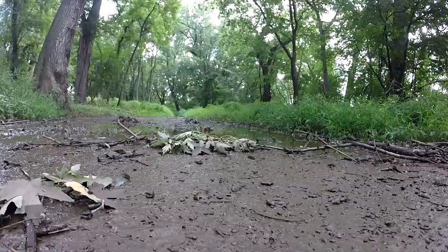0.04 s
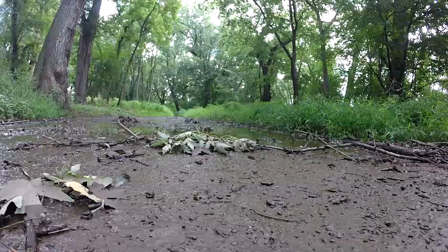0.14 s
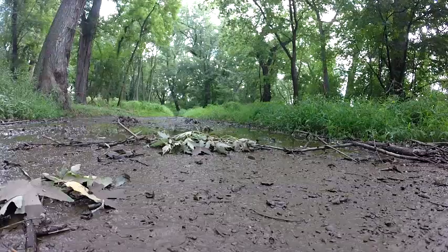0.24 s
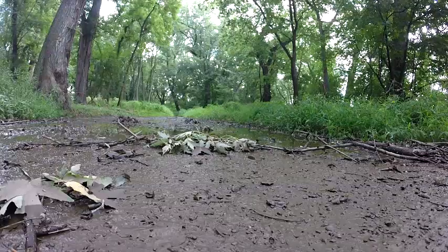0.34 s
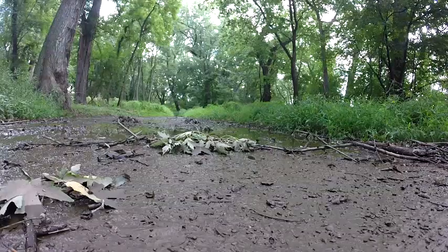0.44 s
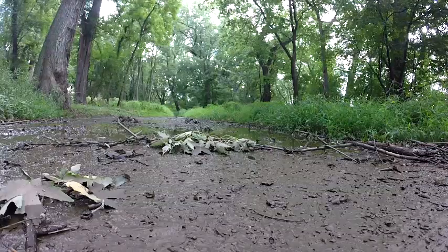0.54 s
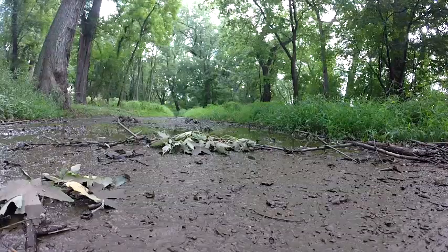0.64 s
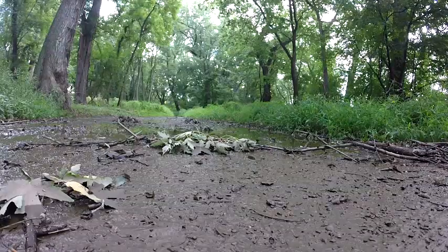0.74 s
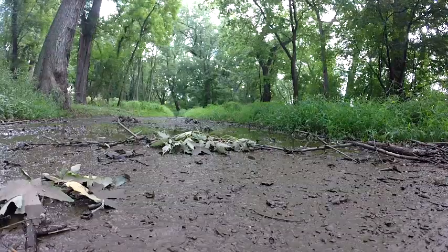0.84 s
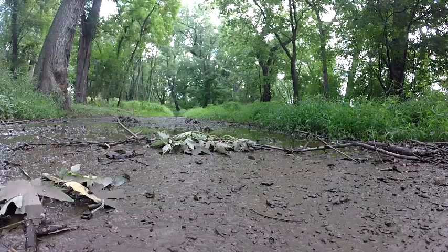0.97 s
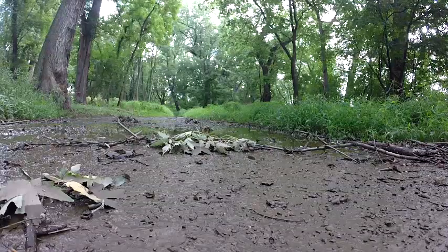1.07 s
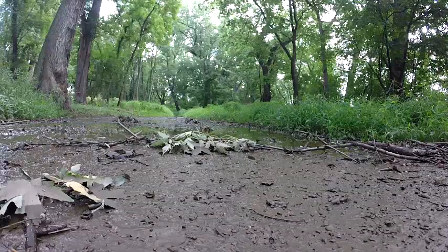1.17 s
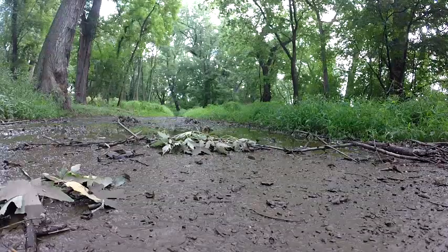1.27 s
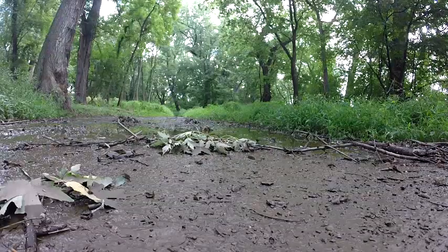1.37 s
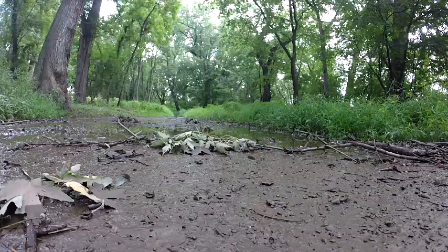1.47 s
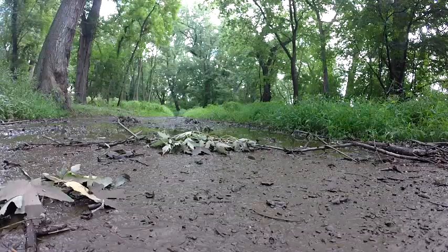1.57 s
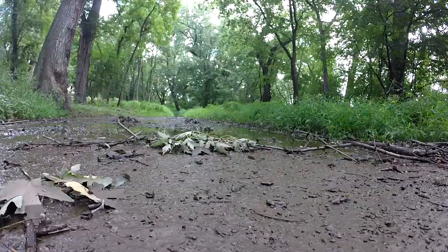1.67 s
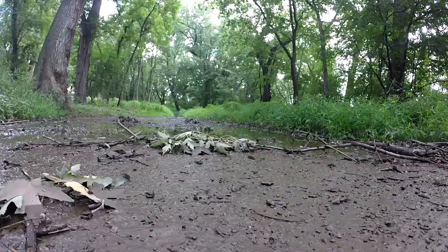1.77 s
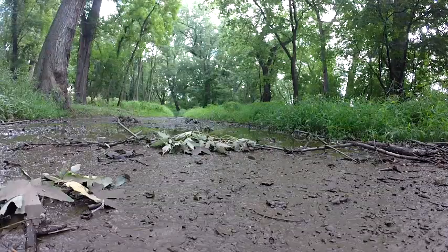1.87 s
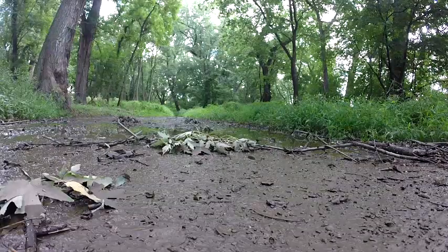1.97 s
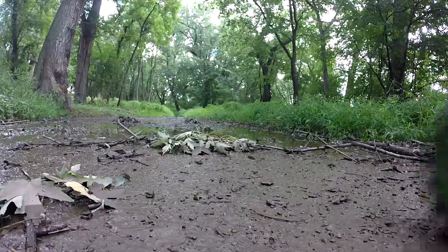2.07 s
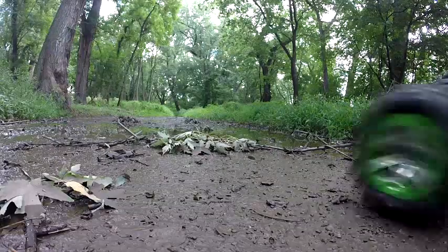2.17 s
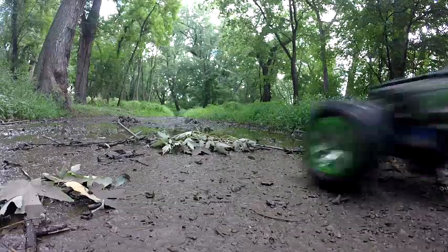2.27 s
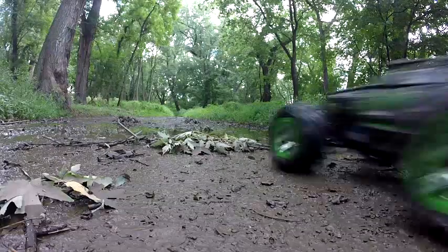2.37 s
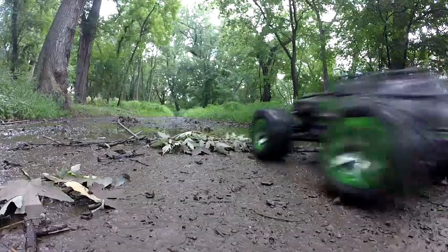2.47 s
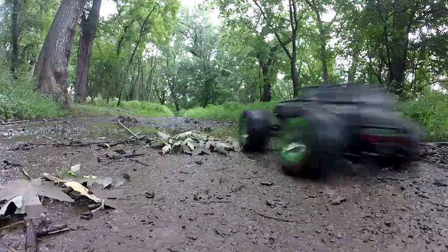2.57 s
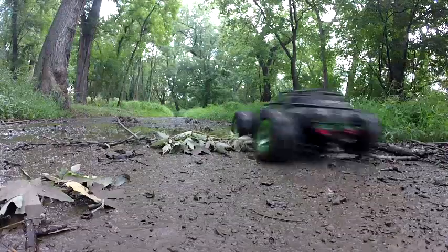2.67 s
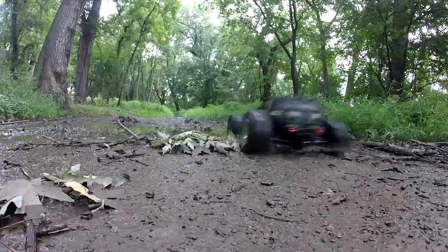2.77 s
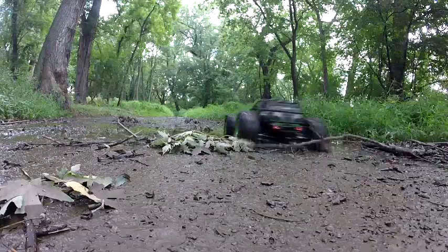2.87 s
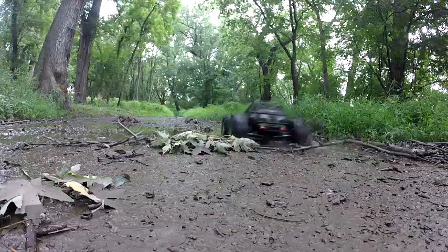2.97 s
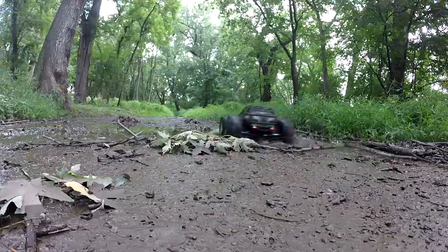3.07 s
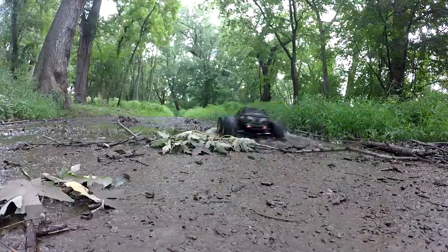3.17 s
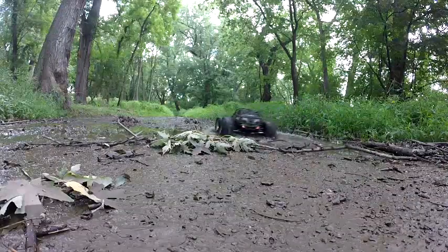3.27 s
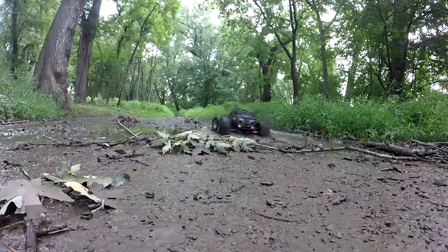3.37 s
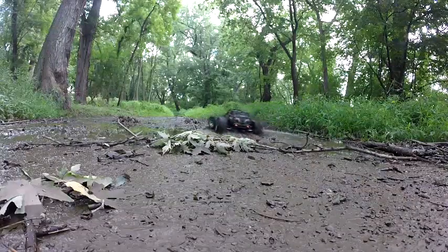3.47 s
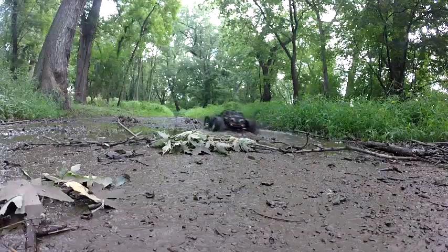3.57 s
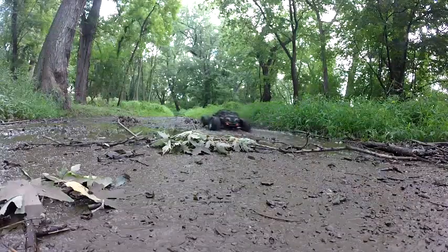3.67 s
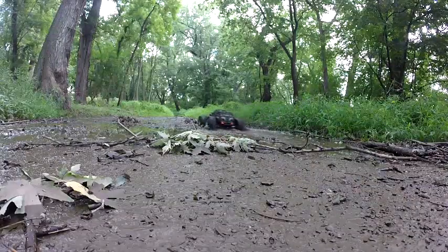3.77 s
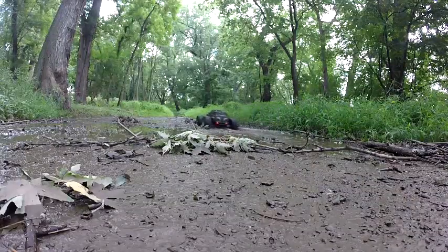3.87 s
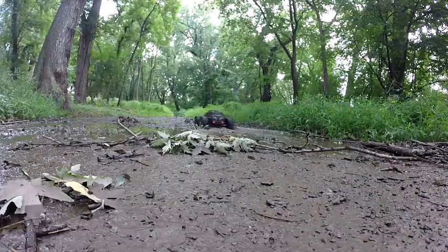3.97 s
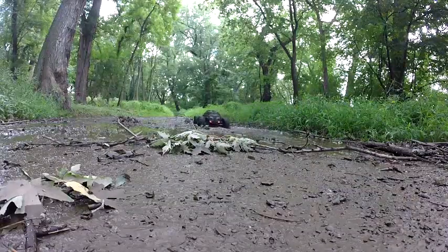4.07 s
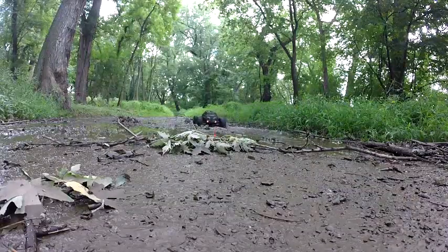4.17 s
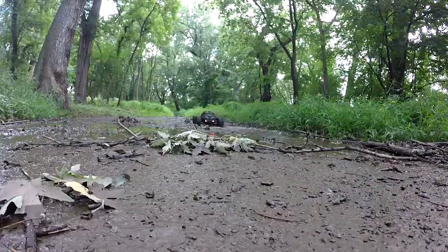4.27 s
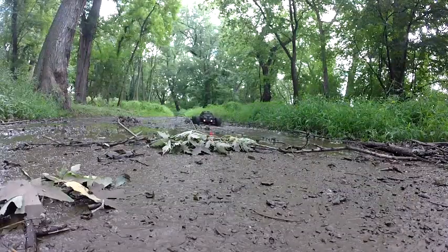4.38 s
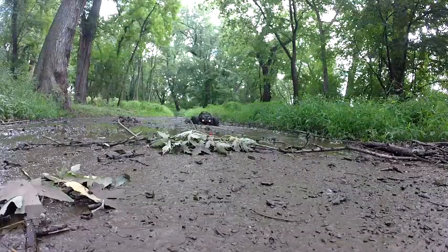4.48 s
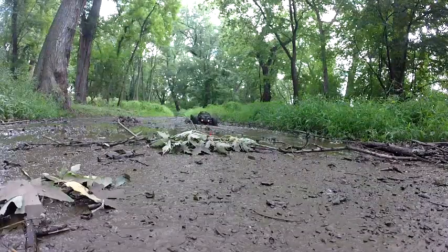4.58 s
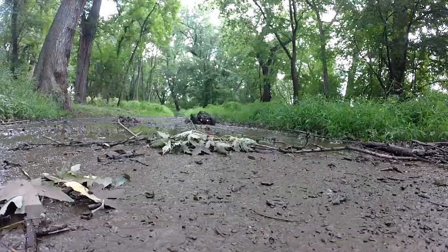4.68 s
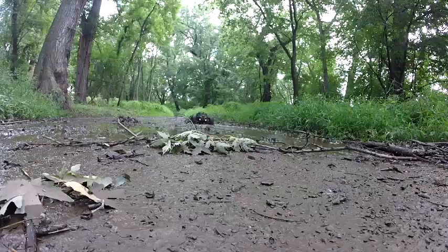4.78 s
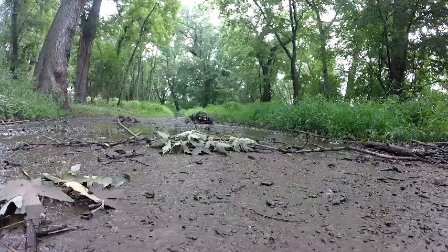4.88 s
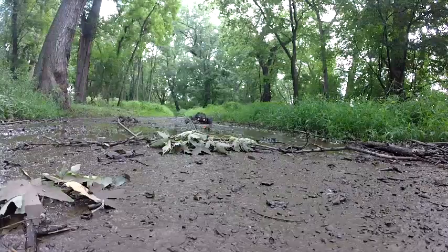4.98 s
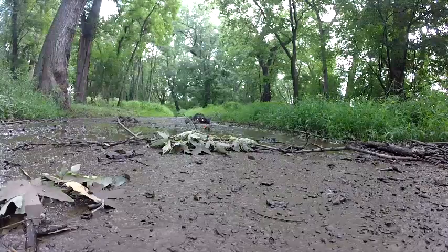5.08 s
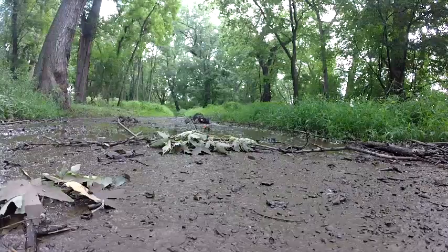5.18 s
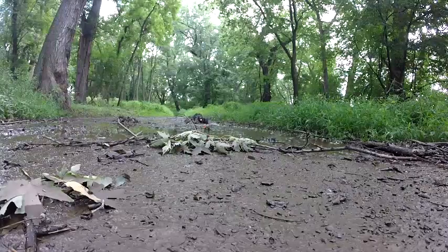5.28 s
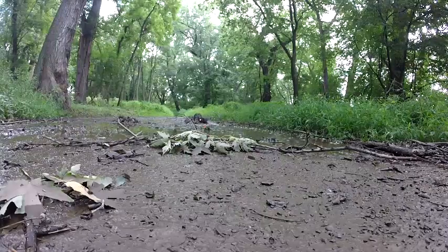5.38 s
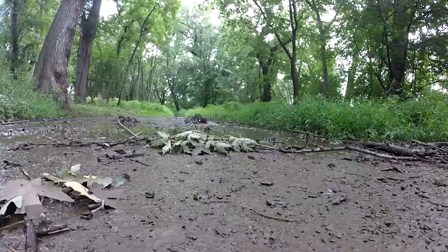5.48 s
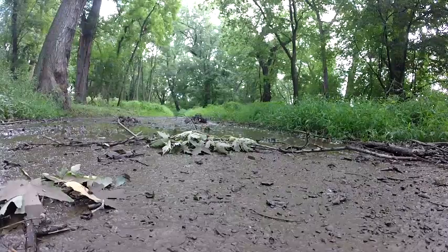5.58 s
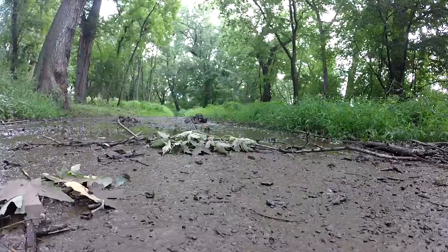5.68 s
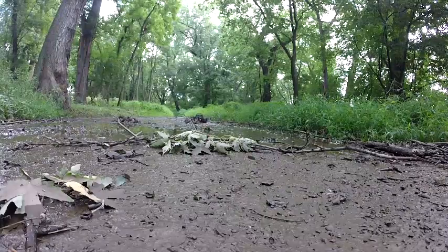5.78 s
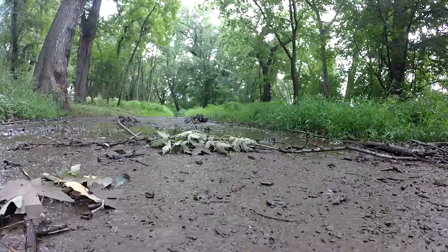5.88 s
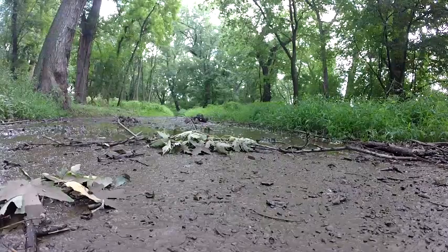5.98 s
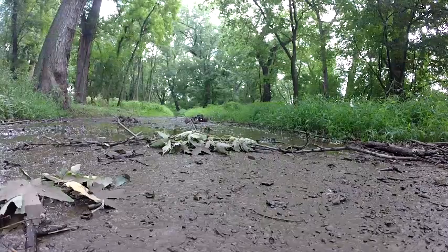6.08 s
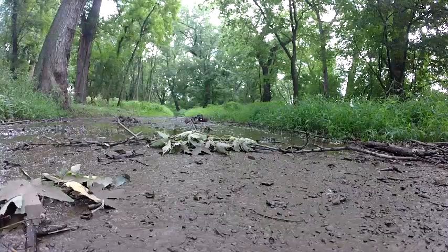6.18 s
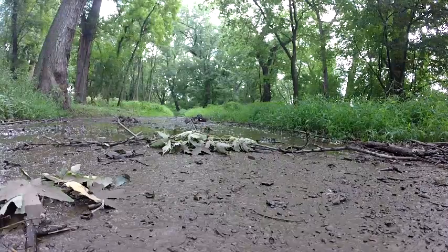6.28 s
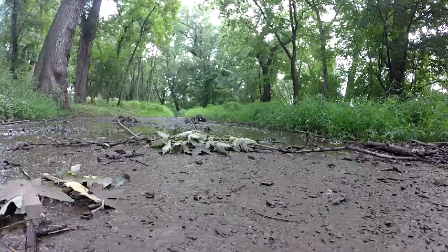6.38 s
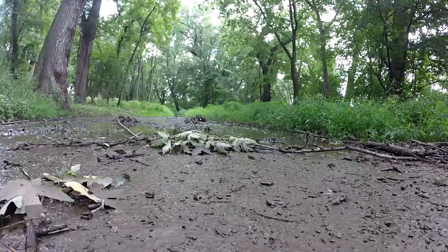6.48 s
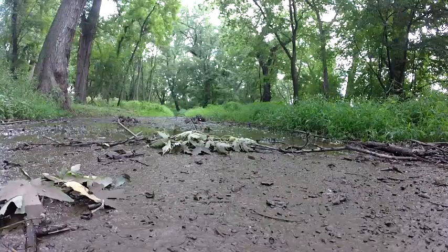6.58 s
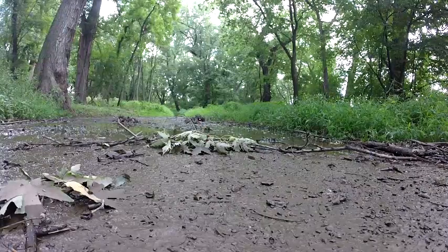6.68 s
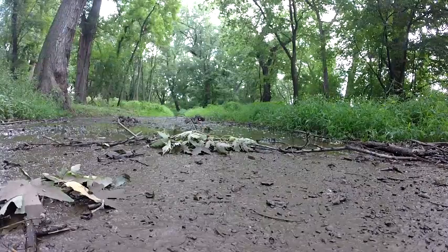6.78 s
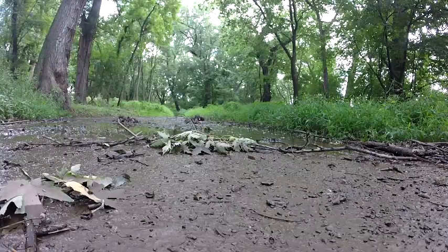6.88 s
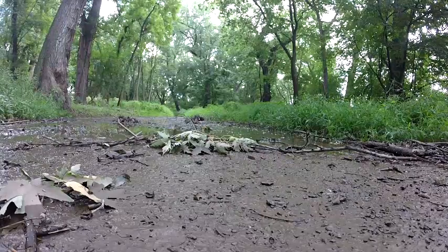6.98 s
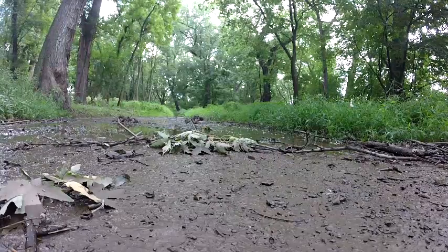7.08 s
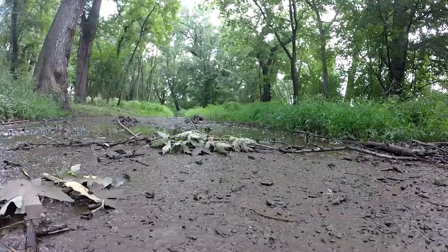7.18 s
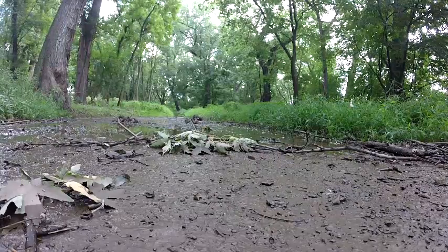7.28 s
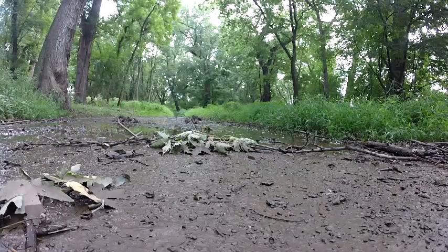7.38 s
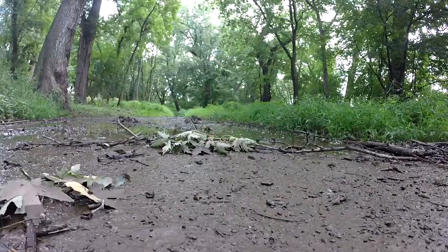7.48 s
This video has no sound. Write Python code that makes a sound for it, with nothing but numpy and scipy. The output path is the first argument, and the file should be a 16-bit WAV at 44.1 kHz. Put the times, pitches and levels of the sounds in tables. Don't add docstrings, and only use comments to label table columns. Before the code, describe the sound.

Faint gear whine from a remote-controlled truck rises over soft woodland air, pulsing as its wheels slip and grip. Plastic rattle thickens into a brief harsh pass right beside the microphone. The truck then shrinks into the distance, still singing high and unsteady, with scattered twig ticks and knocks. Sound is mono, muffled and ringing through a sealed camera case, with faint echoes from trees.

```python
import sys
import numpy as np
from scipy import signal
from scipy.fft import rfft, irfft
from scipy.io import wavfile
from scipy.ndimage import uniform_filter1d

SR = 44100
rng = np.random.default_rng(int(sys.argv[2]) if len(sys.argv) > 2 else 0)


def unload_wav(signal):
    wavfile.write(
        sys.argv[1],
        SR,
        np.round(np.clip(np.atleast_2d(signal).T, -1, 1) * 32767).astype(np.int16),
    )


def convert_level_to_amplitude(level_db):
    exponent = np.asarray(level_db, float) / 20
    return 10 ** exponent


N = 332514
TIME = np.arange(N) / SR
PASSING = (2.15, 2.98)
SPUR_TEETH = 68
WHINE_ORDER, PINION_ORDER = .856, .382


def evened(x):
    return x / np.sqrt(np.mean(x ** 2) + 1e-20)


def curves(rows):
    s, *columns = np.transpose(rows)
    return [np.interp(TIME, s, column) for column in columns]


def wander(hz):
    return evened(signal.lfilter(*signal.butter(2, hz, fs=SR), rng.standard_normal(N)))


def tone(turns, db):
    return np.sqrt(2) * convert_level_to_amplitude(db) * np.cos(2 * np.pi * turns)


def resonate(x, hz, width):
    pole = np.exp((2j * np.pi * hz - np.pi * width) / SR)
    ring = signal.lfilter([(1 - abs(pole)) ** 2], [1, -2 * pole, pole ** 2], x + 0j)
    return 2 * ring.real


def gears(teeth):
    runout = [(1, .26, 0), (2, .45, 1.9), (3, .2, 2.5), (4, .22, 3.2)]
    # time [s], share [0-1].
    load = [(0, 1), (1.25, 1), (1.32, .35), (2.1, .5), (2.2, .5), (2.5, .5), (5.8, .5), (5.95, .9),
            (7.54, .9)]
    # time [s], level [dB].
    current = [(.95, 1), (1.05, 4.5), (1.2, -8), (1.35, 4), (1.8, -1), (2.03, -8), (2.2, -8), (2.55, -8),
               (2.73, -1.5), (3.31, 3), (3.39, 0), (4.03, -18), (4.15, 4), (4.85, 3), (5.5, 3.7),
               (5.62, -7.5), (6.25, -6), (7.54, 0.5)]
    # level when close [dB], share of the distance loss, change once turned away [dB].
    overtone_levels = [
        (-32.5, 1.07, -8),
        (-43.5, 0.96, -10),
    ]
    # level when close [dB], share of the distance loss, change once turned away [dB],
    # share of the motor current.
    low_levels = [
        (-48.5, 0.648, -3, 0.655),
        (-41.5, 0.88, -11, .1),
        (-55.5, 0.66, 3, 0.13),
    ]
    hz = mesh_hz()
    bite_db = slips()[1]
    current_db = curves(current)[0]

    uneven = sum(depth * np.cos(2 * np.pi * k * teeth / SPUR_TEETH + phase) for k, depth, phase in runout)
    throb = 1 + curves(load)[0] * uneven + .2 * wander(120)
    slap = teeth + np.interp(TIME, (2.2, 2.34), (.036, .085)) * wander(200)

    mesh_db = heard(close_db=-31, share=.4, away_db=-10) + ringing(hz) + bite_db
    mesh = tone(slap, mesh_db - 1)
    ring_shares = (0.75, 0.41)
    for k, part, ring in zip((2, 3), overtone_levels, ring_shares):
        overtone_db = heard(*part) + ring * ringing(k * hz) + 0.49 * bite_db
        mesh += tone(k * slap, overtone_db - 2 + 4 * wander(22))
    fourth_db = overtone_db + np.interp(TIME, PASSING, (-9, -15))
    mesh += tone(4 * slap, fourth_db - 2 + 4 * wander(22))

    whine_db = heard(close_db=-37.5, share=0.58, away_db=.3) + current_db + ringing(WHINE_ORDER * hz)
    clean = tone(WHINE_ORDER * teeth, whine_db + 1.5 * wander(9.3))
    for k, (*part, pull) in zip((PINION_ORDER, WHINE_ORDER / 2, 1 / 2), low_levels):
        low_db = heard(*part) + pull * current_db + ringing(k * hz)
        clean += tone(k * teeth, low_db + 2.67 * wander(23))
    return throb * mesh + clean


def mesh_turns():
    return np.cumsum(mesh_hz() * (1 + .0025 * wander(40))) / SR


def mesh_hz():
    # time [s], gear mesh [Hz].
    throttle = [(0, 1871), (.3, 1775), (.43, 1821), (.9, 2032), (1.41, 2163), (1.81, 2225), (2.11, 2299),
                (2.165, 2680), (2.26, 2707), (2.3, 2920), (2.39, 3147), (2.56, 3276), (2.7, 3425),
                (3.25, 3418), (3.5, 3150), (4.4, 3364), (5.7, 3205), (7.54, 3135)]
    return curves(throttle)[0] * (1 + slips()[0] / 100)


def slips():
    # time of top speed [s], lift [%], sag [%], length of the fall [s], bite of the teeth [dB].
    grips = [(0.0, 4, 6.8, 0.16, 4), (.565, 7.5, 4.9, 0.13, 4), (1.074, 6.5, 6.08, 0.13, 4.5),
             (1.529, 4.5, 5, 0.1217, 6), (1.969, 5, 4.56, .115, 14.5), (2.144, 0.2458, 0.404, 0.0788, 1.5),
             (2.67, 3.5, 2.07, 0.0642, 7), (2.809, 1.5, 2.47, 0.075, 13), (2.967, 3, 2.4, 0.158, 5.5),
             (3.26, 0.95, 3.76, .12, 5), (3.571, -0.27, 5.2, 0.1256, 3), (4.19, 2, 3.8, 0.12, 7),
             (4.471, 4.5, 1, 0.1045, 7), (4.76, 3.5, 6.5, 0.11, 11), (5.05, 8, 2.33, 0.096, 12.5),
             (5.21, 1.47, 0.21, .07, 8.5), (5.352, 3.5, 0.28, 0.074, 13.5), (5.5, 3.5, 3.3, 0.0689, 16),
             (5.892, 0.2, 8.4, 0.078, 8), (6.051, -1.5, 8.8, 0.098, 7.5), (6.34, -2, 6.1, 0.083, 9.5),
             (6.575, 0.96, 2.6, 0.11, 8.5), (7.229, 3.5, .1, 0.076, 3), (7.373, 0.8, 6, 0.071, 7.5)]
    spin_up, recover, bite_at = .85, 1.01, .25
    ease = 0.786
    slack_db = -0.14
    inertia_s = 0.023
    speed, bite_db = np.zeros((2, N))
    for s, lift, sag, fall, db in grips:
        knots = s + fall * np.array([-spin_up, 0, 1, 1 + recover])
        stage = np.interp(TIME, knots, range(4))
        stage -= ease * np.sin(2 * np.pi * stage) / (2 * np.pi)
        speed += np.interp(stage, range(4), [0, lift, -sag, 0])
        bite_times = [*knots[:2], s + bite_at * fall, *knots[2:]]
        bite_db += np.interp(TIME, bite_times, [0, slack_db * lift, db, db, 0])
    return uniform_filter1d(speed, int(inertia_s * SR), mode="nearest"), bite_db


def heard(close_db, share, away_db):
    # time [s], level [dB].
    near_levels = [(0, -59.5), (.09, -56), (.5, -56.5), (1.0, -54), (1.5, -49.5), (1.95, -43), (2.12, -42),
                   (2.14, -33), (2.24, -26), (2.3, -35), (2.48, -35), (2.68, -40.5), (3.2, -44.5),
                   (4.1, -53), (5.1, -59), (5.7, -58.5), (7.4, -62.5), (7.54, -65.5)]
    full_close_db = -30
    distance_db = curves(near_levels)[0] - full_close_db
    return close_db + share * distance_db + np.interp(TIME, PASSING, (0, away_db))


def ringing(hz):
    # resonance [Hz], width [Hz], gain [dB].
    ring_modes = [(1033, 234, -1), (1300, 133, -2.5), (1372.5, 70, -1), (1838.4, 204, -5.7),
                  (1998, 192, -4.3), (2120, 90, -10), (2680, 270, -5), (2920, 170, 0.2), (3412, 238, -17),
                  (3780, 600, -6.5), (5350, 160, 4), (6028, 847, -4), (6990, 488, -6), (8370, 3850, -8.5)]
    return 20 * np.log10(sum(convert_level_to_amplitude(db) / (1 + (2 * (hz - f) / width) ** 2) ** 1.51 for f, width, db in ring_modes))


def chatter(teeth):
    # centre [Hz], width [Hz], level from the front [dB],
    # level from behind [dB].
    shell = [(656, 350, -25, -4.5), (985.4, 147, -4, -25.5), (1097, 33.2, -3.5, -1), (1300, 101.7, 1, 0.5),
             (1572, 98, 3.5, 10.5), (1760, 176, 7.5, 3), (2260, 480, -35, -67)]
    case = [(2117, 54, 7.5, -16), (2188, 241, -13, -8), (2580, 383, -4.5, -14.5), (2667, 103, 2.5, 0),
            (2911, 70, 0, 0.5), (3314, 260, -39.5, -9), (3320, 195, -1.5, -3.5)]
    fizz = [(4326, 380, -9, -0.5), (4800, 92, -1, 1), (5660, 575, -4.5, -0.5), (6864, 620, 0.5, -1.5),
            (7040, 822, -1, -4.5), (9140, 1830, -19.5, -18), (11820, 3100, -24, -28.5)]
    # level when close [dB], share of the distance loss, change once turned away [dB],
    # share of a jolt.
    rattle_levels = [
        (-24, 0.988, -9.5, 0.587),
        (-33, 0.571, 0.85, 0.97),
        (-30, 1.005, -0.04, 0.86),
    ]
    # time [s], extra level [dB], length [s].
    jolts = [(0.247, -1, .15), (1.154, 3, .2), (1.56, 1.5, 0.12), (1.993, 6, 0.061), (2.43, 0, .06),
             (3.09, 2, 0.076), (3.233, 0.5, .15), (3.686, 1.5, .5), (4.161, -0.5, 0.13), (4.741, -0.5, .1),
             (5.58, 0.5, 0.11), (5.95, 2.5, 0.11), (6.128, 1, 0.13), (7.43, 4, 0.069)]
    spur_turns = teeth / SPUR_TEETH
    bunch = 1 + .3 * np.cos(4 * np.pi * spur_turns) + .15 * np.cos(2 * np.pi * spur_turns)
    jolt_db = sum(db * np.clip(1 - 2 * abs(TIME - s) / length, 0, 1) for s, db, length in jolts)
    out = np.zeros(N)
    for (*part, shake), modes, spread_db in zip(rattle_levels, (shell, case, fizz), (2.5, 2.5, 1.0)):
        force = convert_level_to_amplitude(spread_db * np.minimum(rng.exponential(1, N), 4))
        struck = rng.random(N) < 11000 / SR
        hits = rng.standard_normal(N) * force * struck
        level_db = heard(*part) + shake * jolt_db - 6 + 0.36 * wander(9.2)
        out += convert_level_to_amplitude(level_db) * evened(body(bunch * hits, modes))
    return out


def body(x, modes):
    out = np.zeros(len(x))
    for k, (hz, width, front_db, back_db) in enumerate(modes):
        side_db = np.interp(TIME, PASSING, (front_db, back_db))
        out += (-1) ** k * convert_level_to_amplitude(side_db) * resonate(x, hz, 1.76 * width)
    return out


def whistle():
    # time [s], pitch [Hz], level [dB].
    whistle_line = [
        (1.5, 3340, -86),
        (1.57, 3415, -62),
        (1.85, 3397, -57),
        (1.9, 3390, -101),
    ]
    hz, db = curves(whistle_line)
    sounding = (TIME > whistle_line[0][0]) * (TIME < whistle_line[-1][0])
    return tone(np.cumsum(hz) / SR, db + 4.6 * wander(16.0)) * sounding


def snaps():
    # time [s], peak [dB], then dull knock, click and crack [dB against the peak].
    twigs = [(3.3486, -36, -18, -12, -17), (3.5764, -40, -20, -14, -25), (3.5898, -27, -10.5, -23, -39),
             (4.045, -44.5, -5.5, 3, -35), (5.0519, -35.5, -25.5, -16.5, -39),
             (5.109, -30, -14, -14, -11.5), (5.1374, -47, -15, -19, -16.5), (5.1602, -43.5, -6, -7.5, -29),
             (5.1695, -47, -2, -17, -22), (5.5051, -50, -19, -5, -27), (5.56, -34.5, -24, -17.5, -36),
             (6.543, -37.5, -25, -17, -14.5), (6.562, -44, -7.5, -24.5, -24), (7.1405, -40.5, -14, -9, -18),
             (7.1446, -46.5, -19, -3.5, -24), (7.1536, -44.5, -11, -21, -17)]
    # (Hz, width Hz)
    colours = [(2900, 350), (2200, 700), (4900, 1600), (7300, 3300)]
    length = 900
    out, t = np.zeros(N + length), np.arange(length) / SR
    for s, db, *parts_db in twigs:
        burst = rng.standard_normal(length) * convert_level_to_amplitude(-60 * t / 0.0039) * np.minimum(t / 0.0004, 1)
        start = round(s * SR)
        for (hz, width), part_db in zip(colours, [-4, *np.add(parts_db, 8)]):
            band = resonate(burst, hz, width)
            out[start:start + length] += convert_level_to_amplitude(db + part_db) * band / abs(band).max()
    return out[:N]


def trees(x):
    t = np.arange(SR // 3) / SR
    trunks = (rng.random(len(t)) < .04) * (t > .006)
    taps = rng.standard_normal(len(t)) * trunks * convert_level_to_amplitude(-60 * t / .5)
    echoes = signal.oaconvolve(x, taps / np.linalg.norm(taps))[:N]
    return signal.lfilter(*signal.butter(2, 5000, fs=SR), echoes)


def forest():
    # frequency [Hz], level [dB per Hz].
    air_colour = [(20, -5), (53, 1.5), (139, -1), (410, -7), (1050, -12.5), (1830, -15.5), (3400, -15.5),
                  (3800, -20), (4400, -14), (6200, -27.5), (7740, -27.5), (12400, -38), (13800, -36.5),
                  (15100, -45)]
    # centre [Hz], width [Hz], level [dB].
    air_modes = [(2810, 130, -68.5), (2680, 72, -87), (3110, 150, -63), (1280.6, 98, -73.5)]
    hz = np.fft.rfftfreq(N, 1 / SR)
    f, db = np.transpose(air_colour)
    colour = convert_level_to_amplitude(np.interp(np.log(hz + 1), np.log(f + 1), db))
    noise = evened(irfft(rfft(rng.standard_normal(N)) * colour, N))
    out = convert_level_to_amplitude(-54.5 + 0.335 * wander(5.2)) * noise
    for centre, width, mode_db in air_modes:
        out += convert_level_to_amplitude(mode_db) * evened(resonate(rng.standard_normal(N), centre, width))
    return out


def scene():
    teeth = mesh_turns()
    near = gears(teeth) + snaps()
    mix = near + convert_level_to_amplitude(-9.5) * trees(near) + chatter(teeth) + whistle() + forest()
    return mix[None]


def top_cut(x):
    return signal.sosfilt(signal.butter(12, 15210, fs=SR, output="sos"), x)


def record(dry):
    # centre [Hz], width [Hz], share cancelled [0-1].
    dead_spots = [(2590, 31, 0.1), (3121, 240, 0), (3370, 230, 1)]
    inside = dry - sum(share * resonate(dry, hz, width) for hz, width, share in dead_spots)
    edge = signal.firwin(511, 15230, window=("kaiser", 9), fs=SR)
    return top_cut(signal.oaconvolve(inside, edge[None], "same"))


dry = scene()
out = record(dry)
unload_wav(out)
```